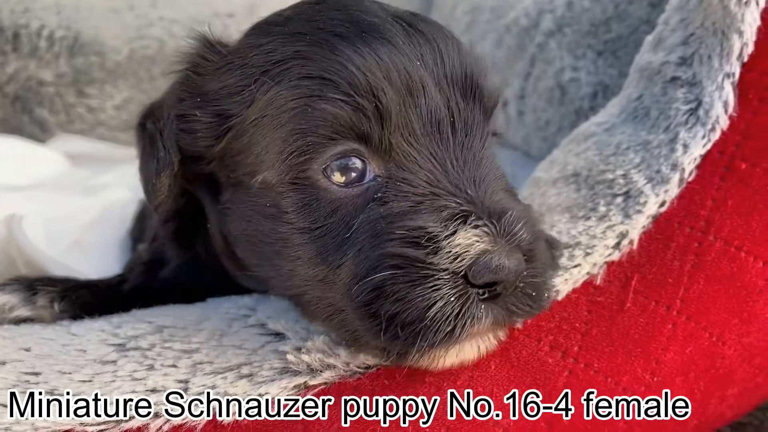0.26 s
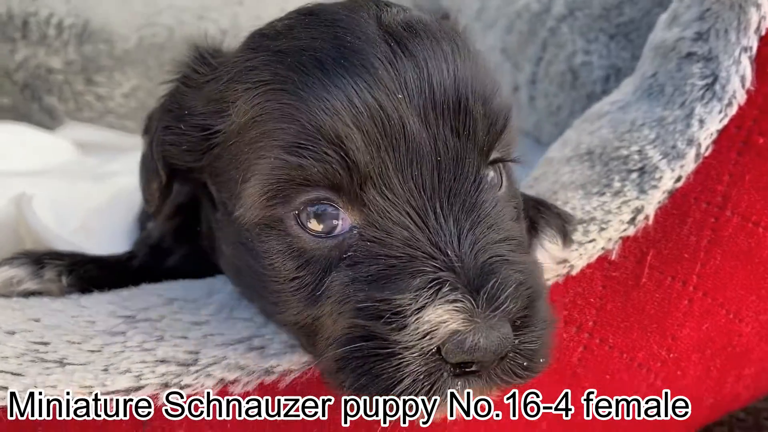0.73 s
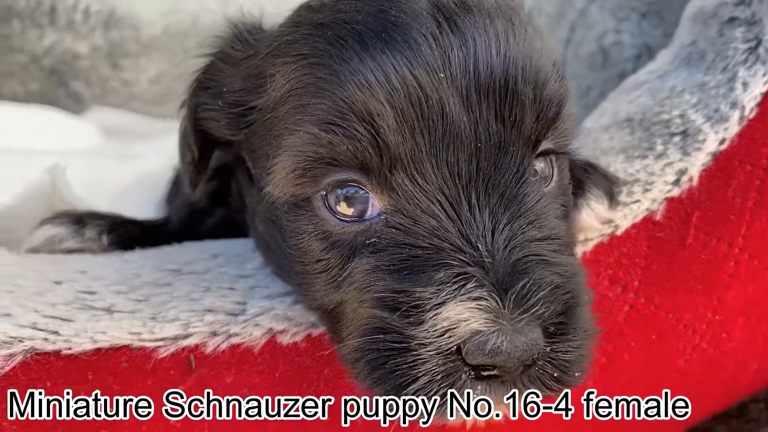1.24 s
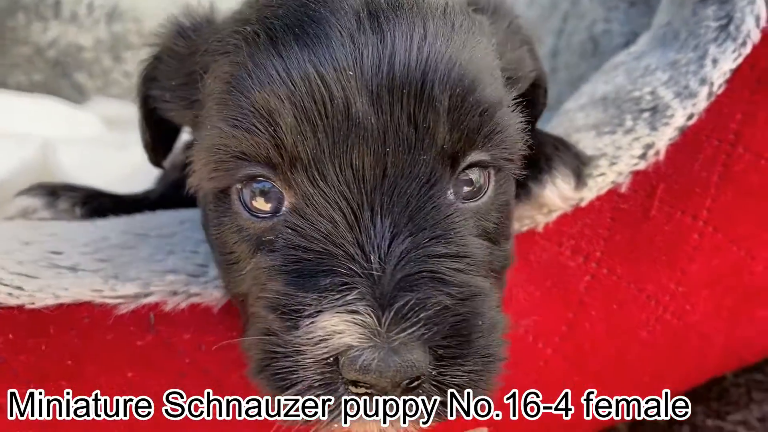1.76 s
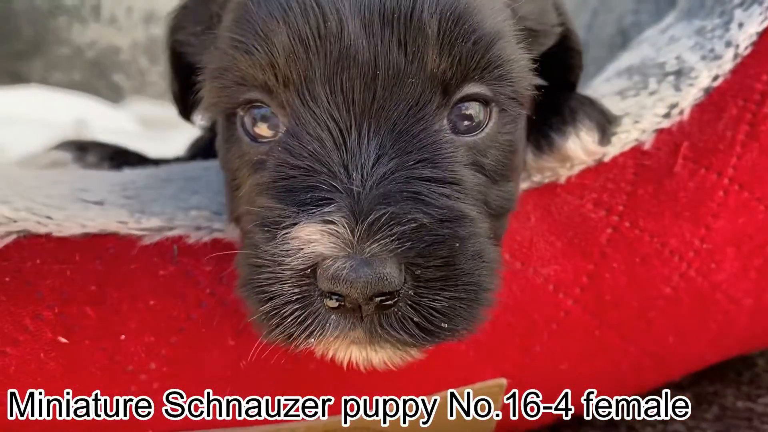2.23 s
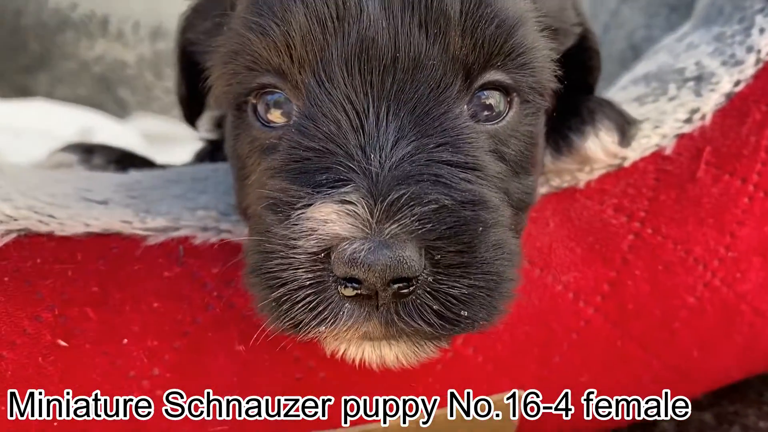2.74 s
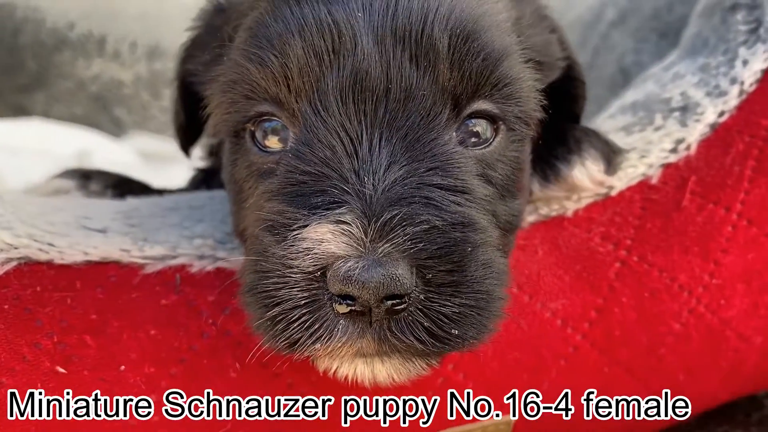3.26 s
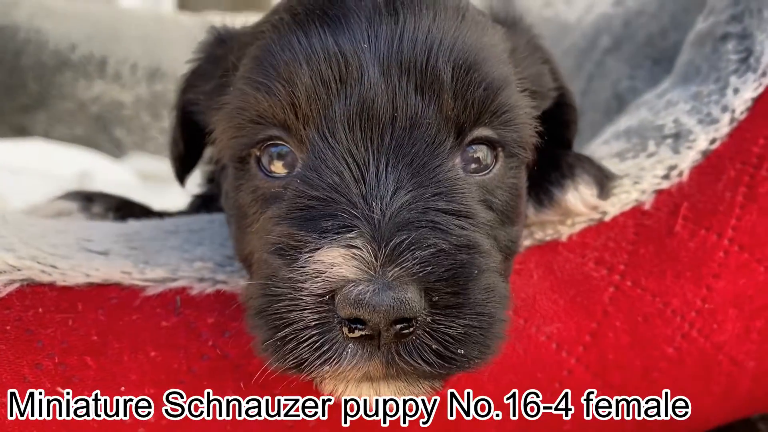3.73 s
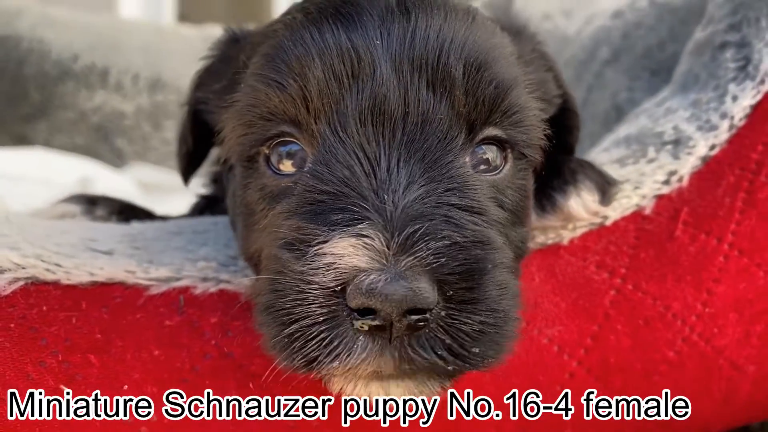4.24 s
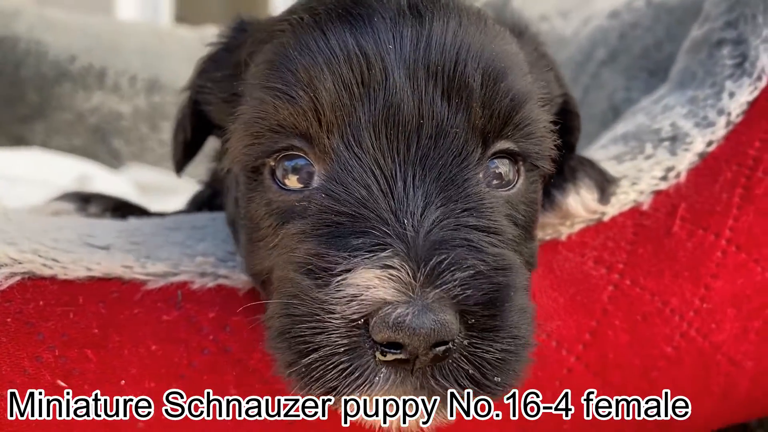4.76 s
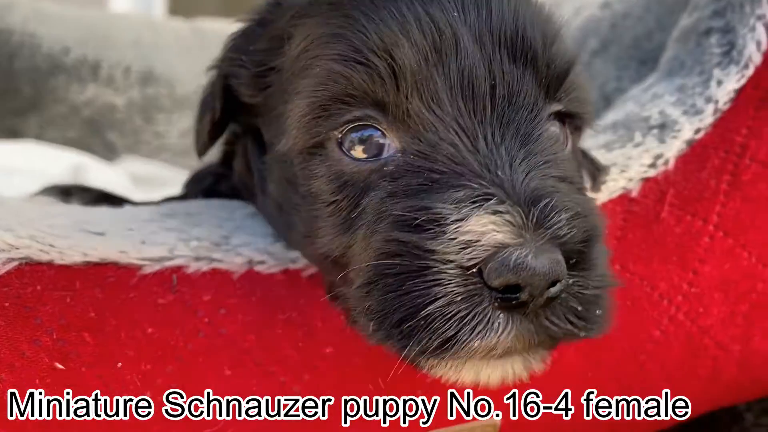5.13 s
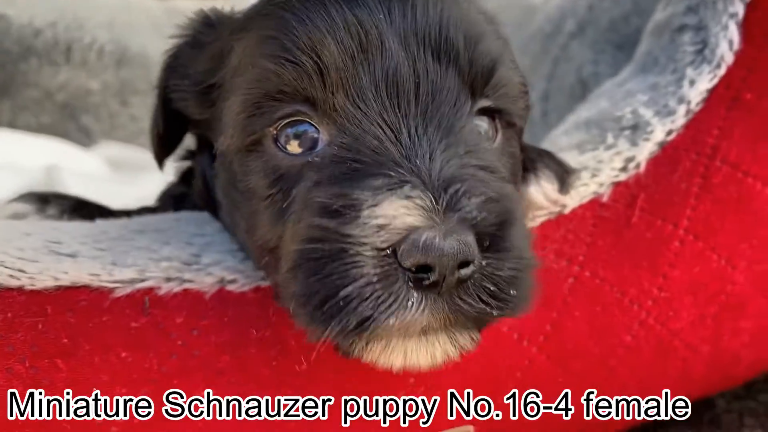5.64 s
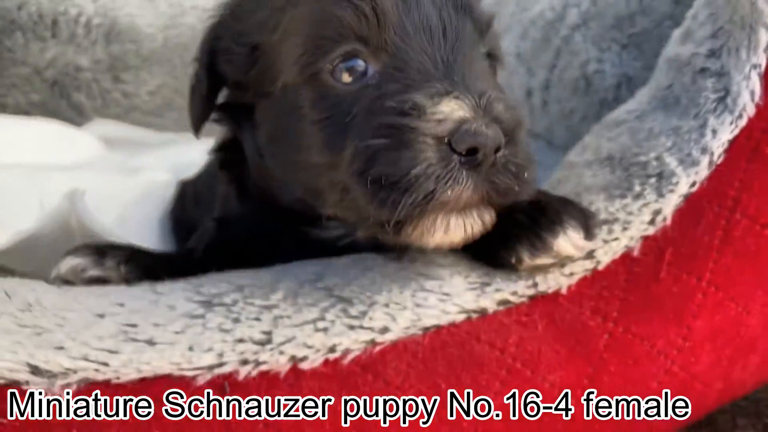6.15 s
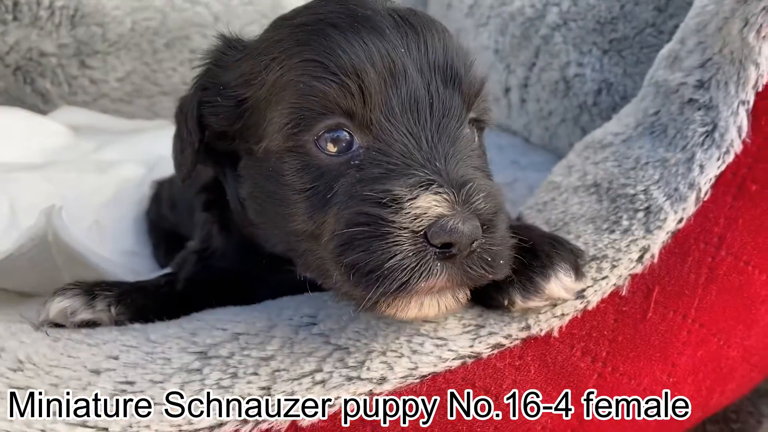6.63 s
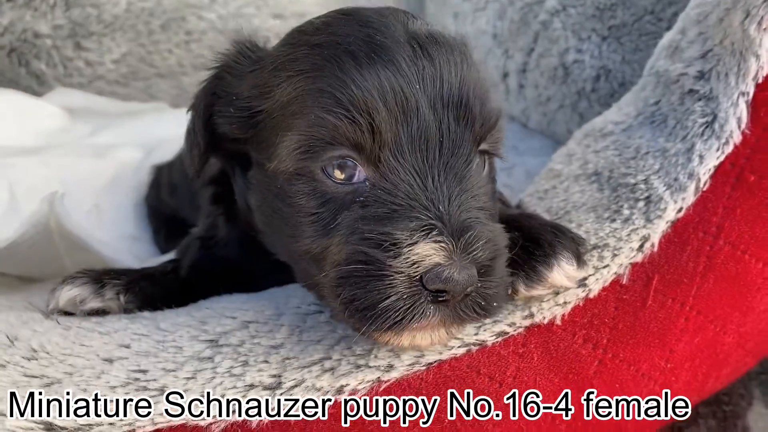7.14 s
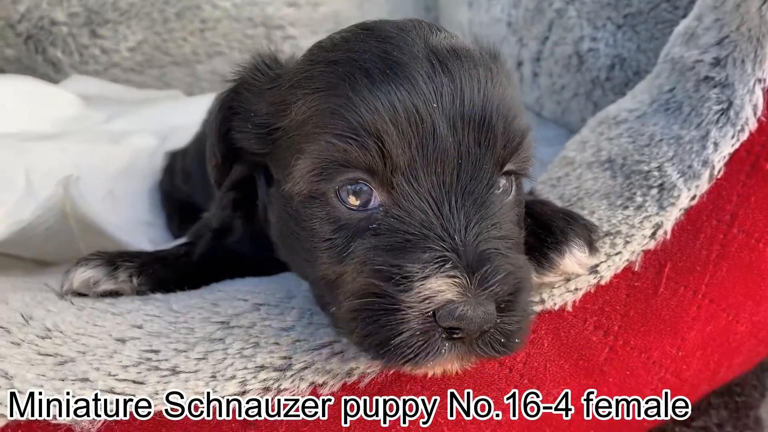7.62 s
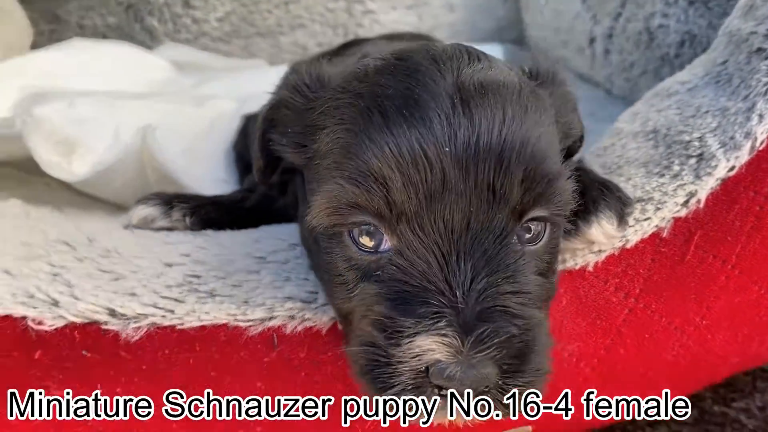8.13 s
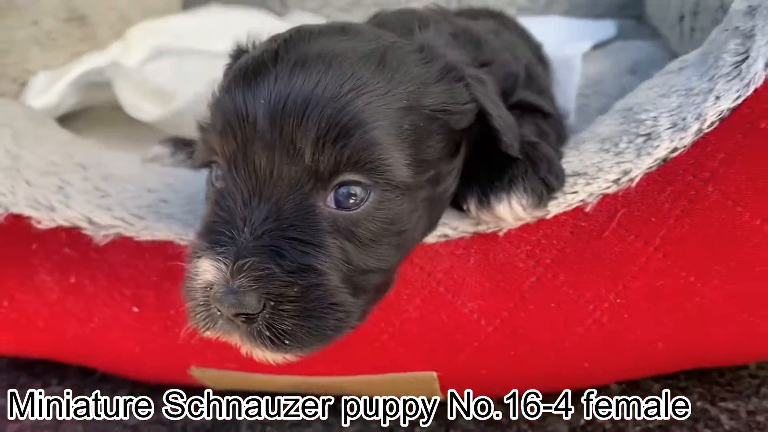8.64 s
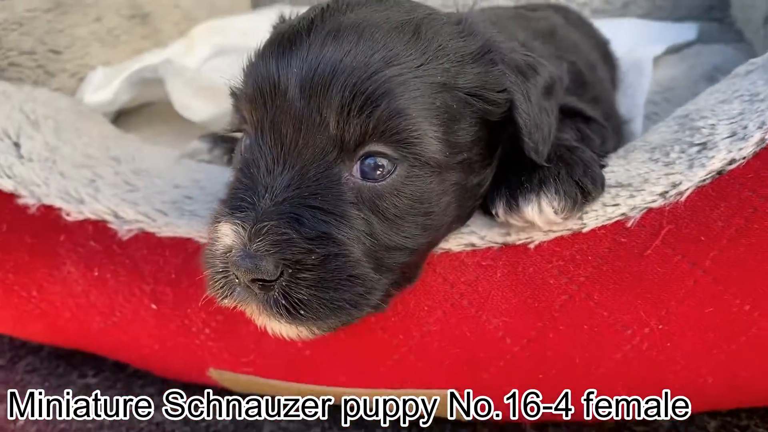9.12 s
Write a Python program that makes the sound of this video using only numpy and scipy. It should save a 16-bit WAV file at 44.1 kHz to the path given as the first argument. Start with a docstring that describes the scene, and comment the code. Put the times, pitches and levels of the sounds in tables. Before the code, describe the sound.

A very young puppy whimpers a hand's width from a phone microphone in a quiet, softly furnished room. Low nasal moans and grunts come first, then isolated high whines that mostly slide downward. Around the middle come a sharp whine, a longer moan and a yip, then tiny wet smacks. Higher, cracking whines and quick yips close it, over a faint low hum and hiss.

```python
"""A young puppy in a plush bed whimpers a hand's width from a phone in a quiet room.
Its voice is a stack of overtones in two registers: low nasal grunts and moans, and high yips and
sliding whines that crack now and then. Shaped noise makes the breath, the puffs from its nose and
a faint airy hiss around each cry; short damped tones make a few soft smacks. Faint breathy tones
are sines that waver at random. A low hum and a faint hiss, both shaped noise, lie under it all."""
import sys
import numpy as np
from scipy import signal
from scipy.fft import rfft, irfft, next_fast_len
from scipy.io import wavfile
from scipy.ndimage import uniform_filter1d

SR = 44100
rng = np.random.default_rng(int(sys.argv[2]) if len(sys.argv) > 2 else 0)


def transcribe(u):
    """Save the signal u as a 16-bit wav file named by the first command-line argument.

    u: samples, shape (n,) or (channels, n), limited to [-1, 1]; the rate is SR.
    q: integer samples, one column per channel.
    """
    v = np.clip(np.atleast_2d(u).T, -1, 1)
    q = np.round(v * 32767).astype(np.int16)
    wavfile.write(sys.argv[1], SR, q)


N = 413643
TIME = np.arange(N) / SR
TOP_HZ = 15700  # nothing sounds much above this


def undb(db):
    """Turn decibels into a gain."""
    return 10 ** (np.asarray(db) / 20)


def along(points, hz):
    """Read a (f/Hz, value) table, with straight lines between its points on a log-frequency axis."""
    f, value = np.transpose(points)
    return np.interp(np.log(hz + 1), np.log(f), value)


def noise(colour):
    """Noise of rms 1 whose spectrum follows a (f/Hz, level/dB) table."""
    size = next_fast_len(N)
    spectrum = rfft(rng.standard_normal(size))
    weight = undb(along(colour, np.fft.rfftfreq(size, 1 / SR)))
    x = irfft(spectrum * weight, size)[:N]
    return x / x.std()


def wander(t, rate):
    """Random values joined by straight lines, `rate` of them a second."""
    u = (t - t[0]) * rate
    return np.interp(u, np.arange(4096), rng.standard_normal(4096))


def swell(at, half, db):
    """A bell-shaped rise and fall of level around one moment."""
    return undb(db) * np.exp(-np.minimum(((TIME - at) / half) ** 2, 50))


def ramp(t, length):
    """Fall from 1 to 0 over the given length in seconds."""
    return np.maximum(1 - t / max(length, 1 / SR), 0)


def background(hum_db, apart):
    """A low wavering hum, nearly alike at both ports, and a hiss that they partly share."""
    # the room's low hum: f/Hz, relative level/dB
    hum_colour = [(20, -33), (40, -23.5), (52, -4), (66, 3.5), (76, 1.5), (88, 2), (110, -4.5),
                  (160, -11.5), (220, -18.5), (320, -25.5), (600, -39.5), (1500, -68)]
    # the hiss above it: f/Hz, relative level/dB
    hiss_colour = [(200, 8), (600, -3.5), (1200, -5.5), (2500, -10.5), (4500, -14.5), (6500, -13.5),
                   (8500, -18.5), (10300, -16), (13000, -26), (14500, -20.5), (16000, -25)]
    # how loud the hiss is over time: t/s, level/dB
    hiss_level = [(0, -59), (.6, -60.5), (1.8, -56.5), (2.7, -57.5), (4, -58.5), (6.1, -63.5), (7.2, -61),
                  (8.4, -58)]
    shared_hum = noise(hum_colour) * undb(hum_db + np.array([[.5], [-.5]]))
    # a weak part with opposite sign at the two ports
    opposed_hum = undb(hum_db - 23.0) * noise(hum_colour) * np.array([[1], [-1]])
    hiss = noise(hiss_colour) + apart * np.array([noise(hiss_colour), noise(hiss_colour)])
    hiss_gain = undb(np.interp(TIME, *np.transpose(hiss_level)))
    return shared_hum + opposed_hum + hiss / hiss.std() * hiss_gain


def room(x, t60, wet_db, damp_hz):
    """A short tail of reflections from soft surroundings, different at each port."""
    t = TIME[:SR // 2]
    decay = np.exp(-np.log(1000) * t / t60)  # down 60 dB after t60 seconds
    tail = rng.standard_normal((2, len(t))) * decay * (t > .004)
    # soft surfaces swallow treble
    tail = signal.sosfilt(signal.butter(1, damp_hz, fs=SR, output="sos"), tail)
    tail = tail / np.sqrt((tail ** 2).sum(axis=1, keepdims=True))
    middle = x.mean(axis=0)[None]
    return x + undb(wet_db) * signal.fftconvolve(middle, tail, axes=1)[:, :N]


def breathy(hz):
    """A tone whose size and phase waver at random, so that it sounds like a narrow band of noise."""
    angle = 2 * np.pi * hz * TIME
    return wander(TIME, 427) * np.sin(angle) + wander(TIME, 328) * np.cos(angle)


def whistles():
    """Faint breathy tones of steady pitch that swell and fade between the cries."""
    # the tones: t/s, half length/s, f/Hz, level/dB
    tones = [(0.021, 0.059, 2860, -54.5), (0.023, 0.048, 3790, -62), (4.52, 0.051, 3760, -69.5),
             (4.935, 0.035, 3740, -70)]
    return sum(swell(at, half, db) * breathy(hz) for at, half, hz, db in tones)


def smack(at, db):
    """A soft tick that rings a few quickly damped modes, a little different each time."""
    # what rings after a smack: f/Hz, level/dB, time to fall by 60 dB/s
    modes = [(302, 0.5, 0.025), (616, 1, 0.019), (1110, -14, 0.031)]
    t = np.maximum(TIME - at, 0)
    detune = 1 + .1 * rng.standard_normal(len(modes))
    out = np.zeros(N)
    for (hz, mode_db, t60), stretch in zip(modes, detune):
        level_db = db + mode_db - 60 * np.minimum(t / t60, 4)
        out += undb(level_db) * np.sin(2 * np.pi * hz * stretch * t)
    return out


def smacks():
    """A run of soft smacks, each a burst of damped tones."""
    # the smacks: t/s, level/dB
    times = [(6.275, -47), (6.338, -42.5), (6.395, -42.5), (6.448, -43.5), (6.529, -46), (6.591, -44.5)]
    return sum(smack(at, db) for at, db in times)


def sniffs():
    """The swelling level of the air that puffs from the puppy's nose."""
    # the puffs: t/s, half length/s, level/dB
    nose_puffs = [(4.267, 0.02, -54.5), (4.355, 0.043, -54), (7.446, 0.08, -60)]
    return sum(swell(at, half, db) for at, half, db in nose_puffs)


def airy_hiss(start, hz, *_):
    """Level of a faint airy hiss around a cry: a quick rise, a level stretch and a slower fall."""
    level_db, rise_s, fall_s = -69.5, 0.011, 0.055
    early = np.maximum(start - TIME, 0)
    late = np.maximum(TIME - start - len(hz) / SR, 0)
    return undb(level_db) * np.exp(-np.minimum(early / rise_s + (late / fall_s) ** 2, 50))


def clock(length):
    """Seconds since the start of a cry."""
    return np.arange(int(length * SR)) / SR


def glide(curve):
    """Start, clock and pitch of a cry that follows a (t/s, f/Hz) curve."""
    s, hz = np.transpose(curve)
    t = clock(s[-1] - s[0])
    return s[0], t, np.interp(s[0] + t, s, hz)


def grunt(curve, db, peak, *manner):
    """A short low cry: one arch of level under a bending pitch."""
    start, t, hz = glide(curve)
    arch_db = 7 * (2 * (t / t[-1] - peak)) ** 2
    # its first rise takes 7.3 ms and its last fall 36 ms
    edge_db = 0.5 * (ramp(t, 0.0073) + ramp(t[-1] - t, 0.036))
    return start, hz, db - arch_db - edge_db, manner


def moan(curve, db, *manner):
    """A longer low cry: a held level under a wavering pitch, prompt to start and easing out."""
    start, t, hz = glide(curve)
    edge_db = 12.5 * (ramp(t, 0.0036) + ramp(t[-1] - t, 0.022))
    return start, hz, db - edge_db, manner


def high_effort(t, hz, attack):
    """Level in dB of a high cry: attack, a building push, release, and the throat's help at each pitch."""
    # loudest where the pitch meets a resonance of the throat: pitch f/Hz, level/dB
    carry = [(330, -4.5), (540, -6.5), (690, -0.5), (800, 2), (980, -1.5), (1200, -8.5), (1450, 0.5),
             (1900, -1.5)]
    attack_db, push_db, push_s, release_db, release_s = 17.5, 6, 0.03, 8, 0.014
    rise_db = attack_db * ramp(t, attack) + push_db * np.exp(-t / push_s)
    return along(carry, hz) - rise_db - release_db * ramp(t[-1] - t, release_s)


def lead_in(start, hz, db, attack):
    """A faint tone on its first pitch leads into a high cry, for longer if the attack is slow."""
    count = max(int(1.2 * attack * SR), 1)
    first_hz = np.full(count, hz[0])
    rise_db = db[0] - np.linspace(56, 0, count)
    return start - count / SR, np.r_[first_hz, hz], np.r_[rise_db, db]


def yip(start, attack, hold, tail, pitch_hz, held_end_hz, tail_hz, overshoot, db, tail_db, *manner):
    """A short high cry: any overshoot settles, the held pitch drifts, then it gives way to a tail."""
    settle_s, collapse_s, ebb_s = 0.0034, 0.0029, 0.0055
    t = clock(hold + tail)

    def give_way(seconds):
        return (1 + np.tanh((t - hold) / seconds)) / 2

    held = np.interp(t, [0, hold], [pitch_hz, held_end_hz]) * (1 + overshoot * np.exp(-t / settle_s))
    hz = held + (tail_hz - held) * give_way(collapse_s)
    level_db = db + high_effort(t, hz, attack) + tail_db * give_way(ebb_s)
    return *lead_in(start, hz, level_db, attack), manner


def whine(curve, attack, db, swell_db, *manner):
    """A sliding high cry whose level follows its pitch."""
    # the voice falters: t/s, half length/s, depth/dB
    falters = [(2.321, 0.012, 8), (3.231, 0.0073, 5), (4.707, 0.039, 5.5)]
    start, t, hz = glide(curve)
    falter_db = sum(depth_db * np.exp(-((start + t - at) / half) ** 2) for at, half, depth_db in falters)
    level_db = db + swell_db * (t / t[-1] - .5) + high_effort(t, hz, attack) - falter_db
    return *lead_in(start, hz, level_db, attack), manner


# The manner of a cry, which ends each row of the four cry tables below: bright/dB, treble/dB,
# roughness/0-1, left-right/dB, nasal band f/Hz, its width/Hz and, in low cries only, mouth f/Hz.
def low_cries():
    """Grunts and moans, in which the folds beat slowly."""
    # pitch of each grunt, most of which flick up as the folds close: t/s, f/Hz
    grunt_pitch = [
        [(.741, 327), (.752, 333.6), (.765, 365), (.773, 420)],
        [(1.009, 302), (1.022, 328), (1.046, 340.7), (1.06, 397), (1.07, 625), (1.076, 600)],
        [(1.625, 359), (1.646, 306.7), (1.664, 306.5), (1.686, 245), (1.7, 254), (1.712, 318)],
        [(5.031, 316), (5.042, 237.6), (5.074, 276), (5.096, 237.6), (5.122, 252), (5.138, 333)],
        [(5.956, 395), (5.981, 337)],
    ]
    # grunts, short: level/dB, peak/share of length, manner
    grunt_rows = [(-32, 0.46, 5, 12, 1, 4.9, 2080, 460, 890),
                  (-28.5, 0.49, 11, 6.5, 0.93, 5.9, 2500, 580, 910),
                  (-29, 0.36, 5.5, 7, 0.71, 5.4, 2660, 600, 950),
                  (-30, 0.4, 2, -19, 0.56, 5.2, 2670, 260, 1040), (-50, 0.6, -8, -5, .1, 4, 2500, 100, 780)]
    # pitch of each moan: t/s, f/Hz
    moan_pitch = [
        [(0.183, 292.4), (0.216, 267), (0.268, 276.7), (0.308, 256), (0.355, 284), (0.448, 263.8), (0.46, 278),
         (0.476, 343), (0.491, 430)],
        [(5.339, 333), (5.352, 321.3), (5.417, 312), (5.447, 262.7), (5.539, 269.6), (5.573, 250.5),
         (5.597, 275), (5.612, 256), (5.623, 370)],
    ]
    # moans, long and level: level/dB, manner
    moan_rows = [(-32.5, 0.72, 9.8, 0.24, 3.3, 2044, 270, 760), (-30, 3.7, 1.4, 0.17, 4.8, 2590, 220, 1050)]
    grunts = [grunt(curve, *row) for curve, row in zip(grunt_pitch, grunt_rows)]
    return grunts + [moan(curve, *row) for curve, row in zip(moan_pitch, moan_rows)]


def high_cries():
    """Yips and whines, in which the folds beat fast."""
    # yips: start t/s, attack/s, hold/s, tail/s, first f/Hz, f at end of hold/Hz, tail f/Hz,
    # overshoot/share, level/dB, change of level in the tail/dB, manner
    yip_rows = [(1.914, 0.013, 0.052, 0.021, 708, 703, 373, 0.046, -24, -20, 0.66, -9, 0.011, 5.6, 4900, 650),
                (5.852, 0.016, 0.053, 0.022, 754, 636, 318, 0, -24.5, -17, 3.8, -54, 0.058, 5.1, 3370, 1040),
                (8.461, 0.0047, 0.051, 0.0097, 713, 772.4, 715, 0.77, -24.5, -1.5, 4.3, 2, 0.53, 9.4, 4100, 620),
                (8.695, 0.0034, 0.046, 0.0086, 763, 761, 690, 0.5, -26, -11, 4.6, 3, 0.49, 8, 4380, 650),
                (9.171, 0.0094, 0.027, 0.022, 900, 841, 510, 0.03, -30, 4, 2.7, -8, 0.56, 8.6, 3730, 830)]
    # pitch of each whine: t/s, f/Hz
    whine_pitch = [
        [(1.324, 784), (1.352, 670), (1.388, 743), (1.41, 697), (1.42, 594)],
        [(2.251, 840), (2.266, 805), (2.29, 806), (2.298, 771), (2.34, 805), (2.349, 735), (2.385, 735),
         (2.398, 485)],
        [(3.098, 991), (3.134, 1135), (3.151, 1154), (3.165, 940), (3.182, 818), (3.215, 760), (3.226, 816),
         (3.243, 819), (3.261, 647), (3.282, 721), (3.293, 505)],
        [(4.684, 1362), (4.706, 1485), (4.735, 1436), (4.747, 1227), (4.755, 998), (4.768, 837), (4.8, 717),
         (4.828, 705), (4.838, 630)],
        [(7.475, 1880), (7.481, 1390), (7.492, 1236), (7.515, 1220), (7.565, 990), (7.588, 1042)],
        [(7.81, 1451), (7.838, 1611), (7.85, 1950), (7.862, 2002), (7.873, 1754), (7.877, 1468), (7.898, 909),
         (7.918, 736), (7.934, 781), (7.99, 708), (8.011, 512)],
        [(8.2, 997), (8.206, 826), (8.238, 823), (8.25, 760), (8.266, 753), (8.282, 568), (8.302, 532)],
        [(9.016, 1404), (9.026, 1040), (9.044, 985), (9.06, 1044), (9.07, 1244), (9.096, 922), (9.104, 764),
         (9.126, 690), (9.144, 846)],
    ]
    # whines: attack/s, level/dB, swell from start to end/dB, manner
    whine_rows = [(0.014, -25, -1.5, 2, -8, 0.18, 5.2, 4270, 780),
                  (0.02, -28.5, -3, -5, -4, 0.11, 5.9, 5000, 460),
                  (.018, -28.5, -1, -.5, -2.5, 0.34, 4.1, 4960, 550),
                  (0.0055, -23, -0.5, 3, -1, 0.3, 5.3, 5100, 460),
                  (0.0025, -25.5, -6, 3, 1.5, 0.12, 3.6, 3770, 930),
                  (0.0063, -25, 2.5, 6.5, 0, 0.31, 5.4, 3870, 1300),
                  (0.003, -25.5, 0.5, 7, -3, 0.38, 5.2, 3850, 580),
                  (0.00081, -30.5, -8.5, 11.5, -4, 0.17, 7.8, 3920, 980)]
    yips = [yip(*row) for row in yip_rows]
    return yips + [whine(curve, *row) for curve, row in zip(whine_pitch, whine_rows)]


def ringing(throat, hz):
    """Phase by which the throat's resonances shift each frequency, so that they ring after each beat."""
    size = 2048
    f = np.fft.rfftfreq(size, 1 / SR)
    # folding the cepstrum onto positive times gives the minimum phase of this spectrum
    cepstrum = irfft(np.log(undb(along(throat, f))))
    return np.interp(hz, f, rfft(2 * cepstrum[:size // 2], size).imag)


def call(cry, throat, air, tremor, jitter, air_db, air_gate, band_db, grit, strain_db, close_db, close_s,
         uneven_db):
    """One cry: the folds beat at the pitch, the throat weights the harmonics, air hisses once a cycle."""
    # the vocal folds lose their beat: t/s, half length/s, depth/0-1
    cracks = [(0.231, 0.0076, 0.5), (1.664, 0.0075, 0.28), (4.74, 0.013, 0.04), (5.045, 0.0041, 0.5),
              (7.576, 0.0044, 1), (8.199, 0.0032, 0.5), (8.283, 0.013, 0.22), (8.698, 0.0035, 0.4),
              (9.103, 0.0107, 0.93), (9.193, 0.0049, 0.2)]
    # the head's shadow: f/Hz, factor on the left-right difference
    shadow = [(200, 0.9), (400, 0), (720, 1.22), (1400, 0.77), (2400, 1.27), (3100, 3), (5500, 2.5),
              (7500, 0.46), (15000, 0)]
    start, pitch_hz, effort_db, manner = cry
    bright_db, treble_db, rough, pan_db, band_hz, band_width, *mouth = manner
    span = int(start * SR) + np.arange(len(pitch_hz))
    t = TIME[span]
    crack = sum(depth * np.exp(-((t - at) / half) ** 2) for at, half, depth in cracks)

    # tremor and cycle-to-cycle jitter blur the upper harmonics
    shake = (jitter * rough + .11 * crack) * wander(t, pitch_hz.mean())
    hz = pitch_hz * (1 + tremor * wander(t, 90) + shake)
    turns = np.cumsum(hz) / SR
    # within a cry the voice brightens by strain_db for each octave that it rises
    bright_db = bright_db + strain_db * np.log2(pitch_hz / pitch_hz.mean())
    # it dulls as the mouth closes at the end
    bright_db = bright_db - close_db * ramp(t[-1] - t, close_s)

    # one row for each half multiple of the pitch
    multiple = np.arange(1, 2 * int(TOP_HZ / hz.min()))[:, None] / 2
    f = multiple * hz
    tone_db = along(throat, f)
    tone_db += bright_db * along([(900, 0.058), (1500, 0.79)], f)
    tone_db += treble_db * along([(3000, 0.015), (5500, 1.0)], f)
    # the nasal cavity lifts one band in a low cry and swallows one in a high cry
    # that band drifts as the muzzle moves
    band_center = band_hz * (1 + 0.018 * wander(t, 12.5))
    tone_db += band_db * np.exp(-((f - band_center) / band_width) ** 2)
    # small movements of mouth and nose make the overtones come and go
    together_db = 1.2 * wander(t, 28)
    each_db = uneven_db * np.array([wander(t, 55) for _ in multiple])
    tone_db += (together_db + each_db) * np.clip((multiple - 2) / 3, 0, 1)
    # the mouth's resonance in the low register
    tone_db += sum(8 * np.exp(-((f - mouth_hz) / 224) ** 2) for mouth_hz in mouth)
    # a voice that barely sounds, or flips up into a whistle, is nearly a pure tone
    pure_db = np.minimum(effort_db + 30.5, 0) + along([(1350, 2.5), (1550, -17), (1900, -12)], hz)
    tone_db += (multiple > 1) * pure_db

    # in a rough voice or a crack strong and weak beats alternate, which sounds the half multiples
    uneven = crack + 0.55 * rough ** 3 * wander(t, 128.0)
    # folds that slacken quickly beat raggedly, which fills the gaps between the overtones with grit
    fall = uniform_filter1d(-np.gradient(np.log2(pitch_hz)) * SR, size=600)  # octaves per second
    ragged = np.clip(fall / 19, rough, 1) * (multiple > 2)
    uneven = uneven + grit * ragged * np.array([wander(t, pitch_hz.mean()) for _ in multiple])
    half_share = uneven * np.minimum(multiple, 1) ** 3
    size = undb(tone_db) * (f < TOP_HZ) * np.where(multiple % 1, half_share, 1)

    # left and right differ by pan_db, more or less so at each frequency
    ears = size * undb(np.multiply.outer([.5, -.5], pan_db * along(shadow, f)))
    ears = ears / np.sqrt((ears ** 2).sum(axis=1).mean(axis=0) / 2)
    voice = -(ears * np.cos(2 * np.pi * multiple * turns + ringing(throat, f))).sum(axis=1)
    # rough, leaky folds let more air through
    leak = np.sqrt(abs(rough)) + crack
    puffs = air[:, span] * (1 + air_gate * np.cos(2 * np.pi * turns)) * leak
    breath_db = air_db + 0.7 * bright_db + 0.18 * (treble_db + pure_db)
    # 6 ms fades at both ends
    fade = np.sin(np.pi / 2 * np.clip(np.minimum(t - t[0], t[-1] - t) / .006, 0, 1)) ** 2
    effort = fade * undb(effort_db + .6 * wander(t, 150))
    out = np.zeros((2, N))
    out[:, span] = effort * (voice + undb(breath_db) * puffs)
    return out


def puppy():
    """Low and high cries in an airy hiss, puffs from the nose, a tiny lip tick and a run of soft smacks."""
    # strength of a harmonic in the low register: f/Hz, level/dB
    low_throat = [(260, 16), (540, 9.5), (680, 7.5), (820, -3.5), (1100, -15.5), (1600, -14), (2000, -23.5),
                  (2600, -38), (3100, -44), (4500, -61), (6200, -40), (8000, -58), (10000, -35),
                  (15000, -42)]
    # strength of a harmonic in the high register: f/Hz, level/dB
    high_throat = [(500, 6.5), (850, 8.5), (1200, -17.5), (1480, -6), (1800, -7), (2300, -9), (2900, -17),
                   (3450, -26), (4000, -23.5), (4800, -32), (5600, -28), (6400, -31.5), (7300, -29.5),
                   (10000, -23.5), (12500, -32.5), (14200, -38)]
    # air rushing through the nose: f/Hz, relative level/dB
    nose = [(300, -59), (1000, 2.5), (2400, 4), (3400, -1), (4600, -3.5), (6200, -1), (7800, -0.5),
            (10000, 6), (11500, -2.5), (13200, 0), (14400, 7), (15800, -15)]
    air = noise(nose) + .4 * np.array([noise(nose), noise(nose)])
    # the low register also rasps in the throat's upper resonance
    rasp = undb(1.0) * noise([(1400, -10), (2000, -3), (2600, -7), (3200, -20), (8000, -58)])
    low, high = low_cries(), high_cries()
    low_voice = sum(call(cry, low_throat, air + rasp, tremor=.003, jitter=.014, air_db=-33, air_gate=.9,
                         band_db=19.5, grit=.08, strain_db=11, close_db=8.5, close_s=.045, uneven_db=2)
                    for cry in low)
    high_voice = sum(call(cry, high_throat, air, tremor=.007, jitter=.005, air_db=-29.5, air_gate=.7,
                          band_db=-17, grit=.35, strain_db=0, close_db=6, close_s=.012, uneven_db=3)
                     for cry in high)
    tick = swell(3.082, .001, db=-48)
    around_cries = sum(airy_hiss(*cry) for cry in low + high)
    return low_voice + high_voice + air * (around_cries + sniffs() + tick) + smacks()


def scene():
    """The puppy in its bed, whose sides scatter the sound briefly, in its room."""
    near = room(puppy() + whistles(), t60=0.066, wet_db=-18.5, damp_hz=11100)
    return room(near, t60=0.33, wet_db=-33, damp_hz=4730) + background(hum_db=-46.5, apart=1.0)


def record(dry):
    """The phone's two ports hear each frequency with its own delay; the top is cut."""
    # the two microphone ports: f/Hz, lead of the left/radians
    port_lead = [(0, 0), (750, .5), (1450, 2.2), (2200, 5.6), (2930, 8.2), (3900, 6.1), (6200, 6.7),
                 (7750, 4.1), (11800, -2.9), (12500, -3.4), (13400, -5.7), (14400, -6.5), (15800, -9.5)]
    size = next_fast_len(N)
    lead = np.interp(np.fft.rfftfreq(size, 1 / SR), *np.transpose(port_lead))
    turned = rfft(dry, size) * np.exp(1j * np.outer([.5, -.5], lead))
    ports = irfft(turned, size)[:, :N]
    return signal.sosfilt(signal.ellip(8, .2, 70, TOP_HZ, fs=SR, output="sos"), ports)


dry = scene()
out = record(dry)
transcribe(out)
```